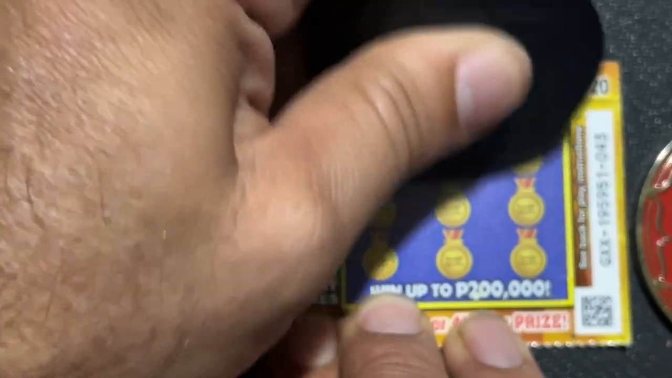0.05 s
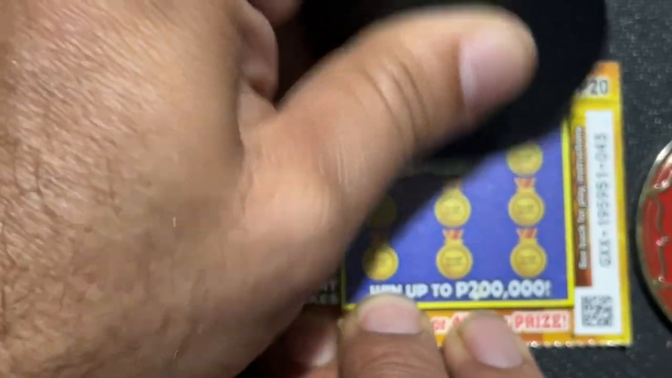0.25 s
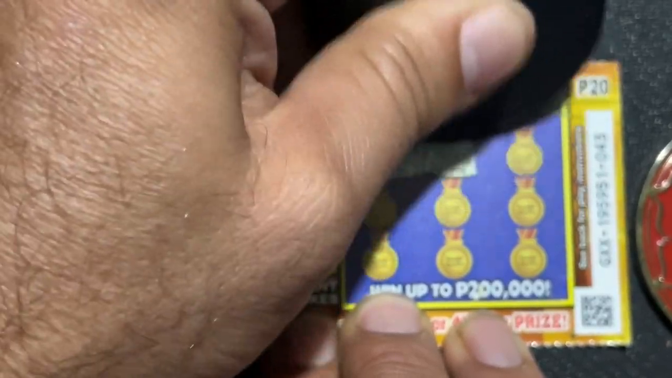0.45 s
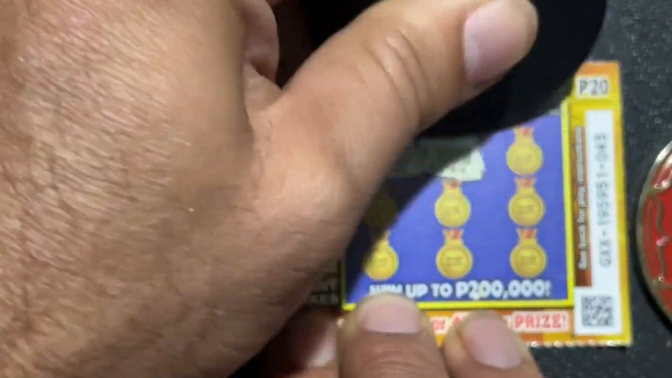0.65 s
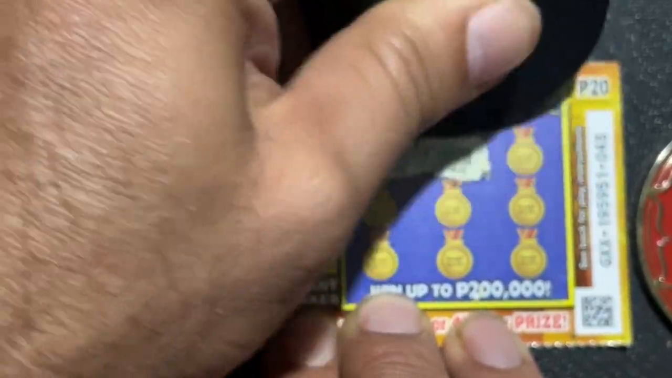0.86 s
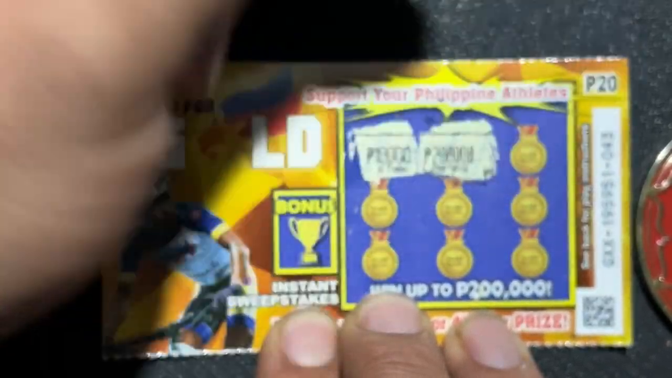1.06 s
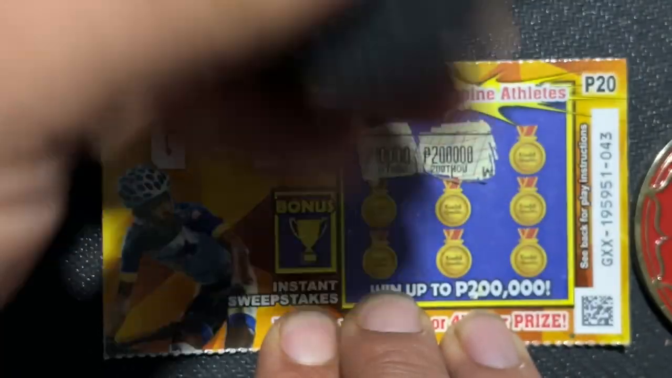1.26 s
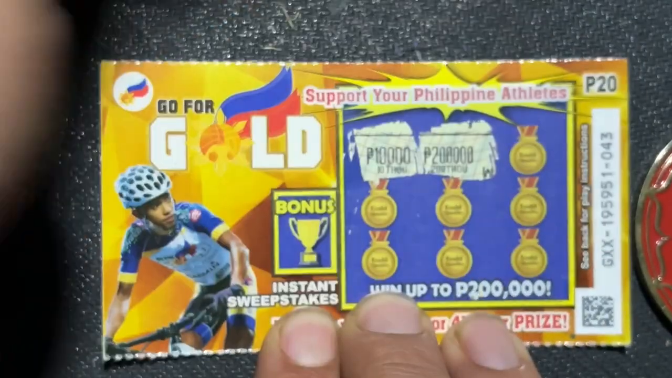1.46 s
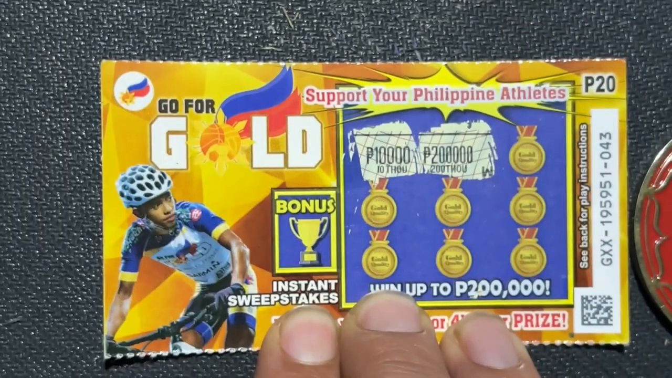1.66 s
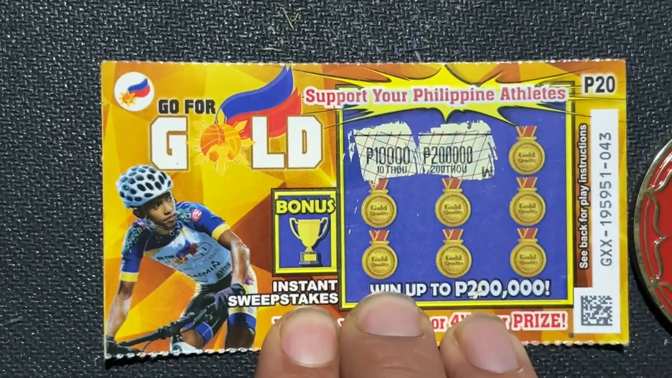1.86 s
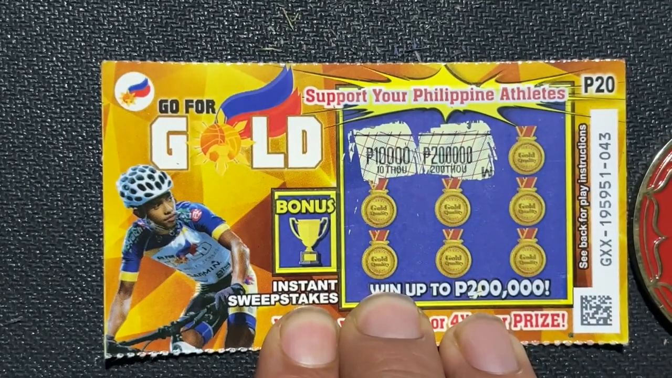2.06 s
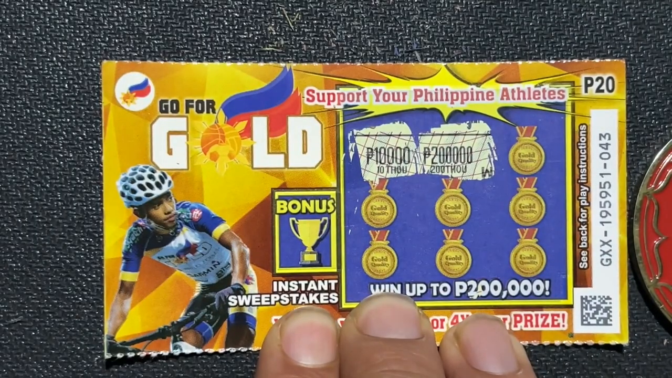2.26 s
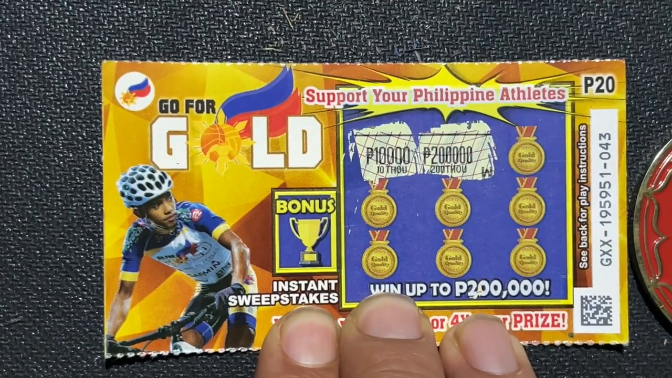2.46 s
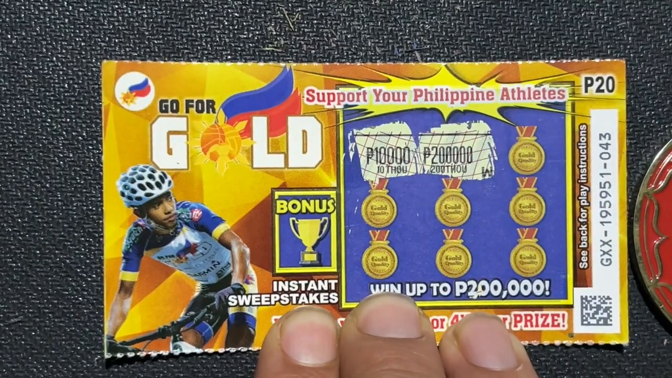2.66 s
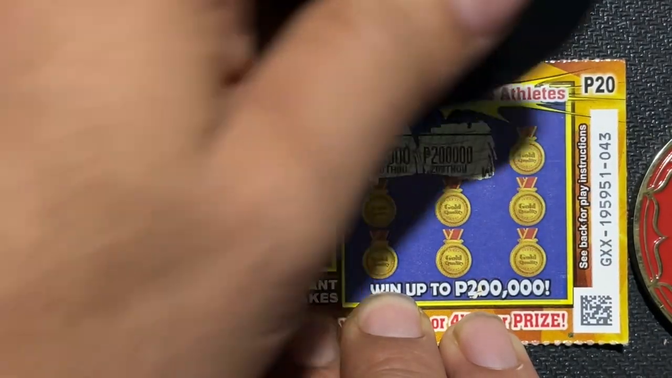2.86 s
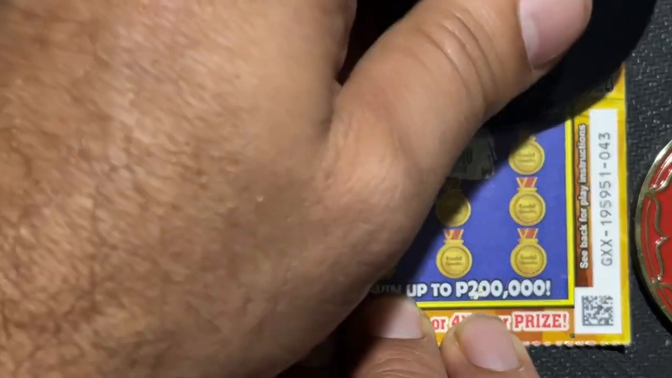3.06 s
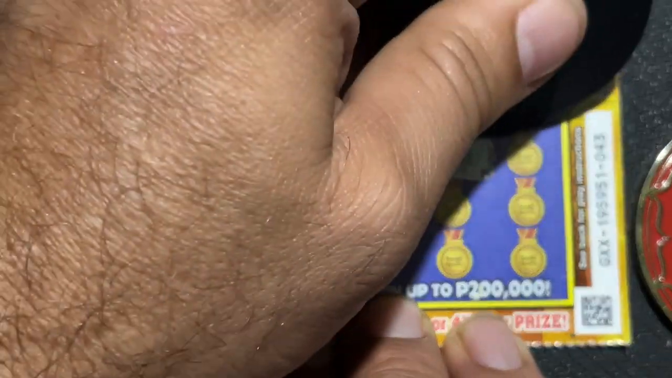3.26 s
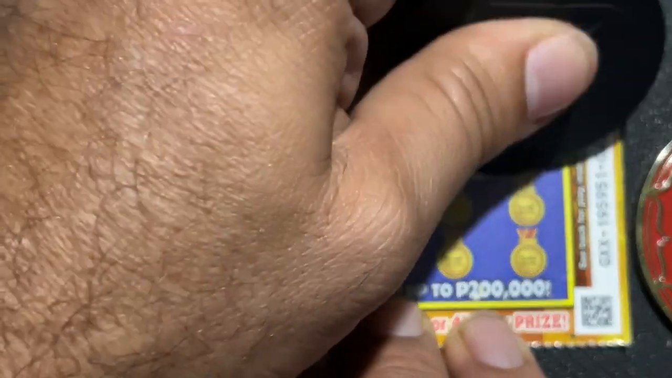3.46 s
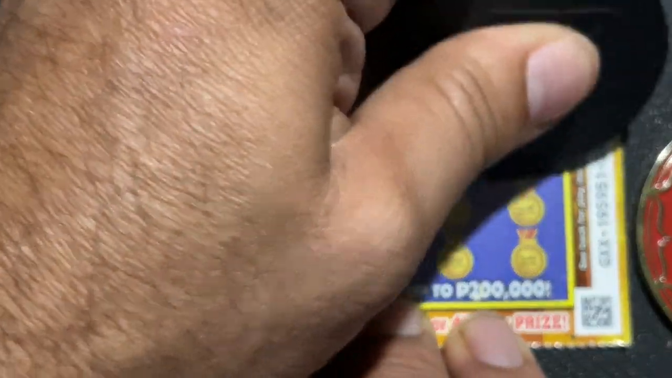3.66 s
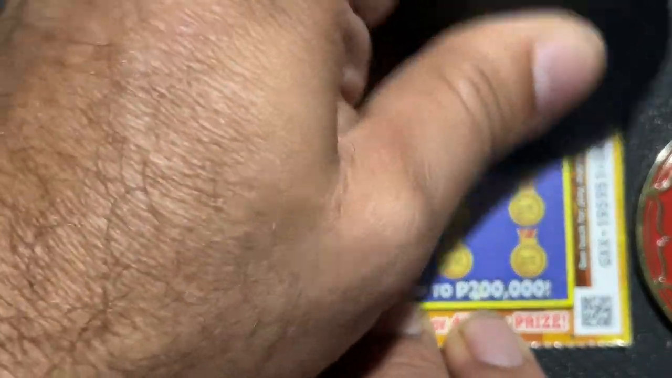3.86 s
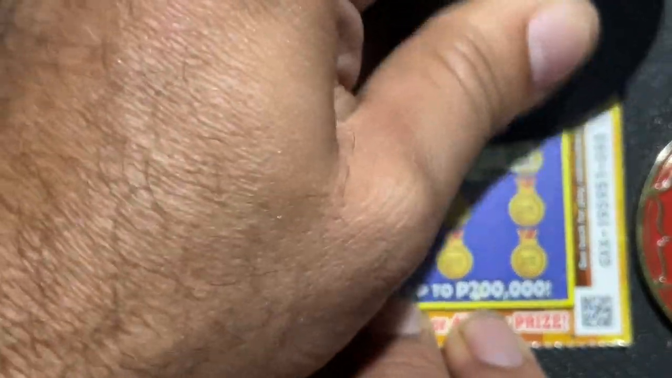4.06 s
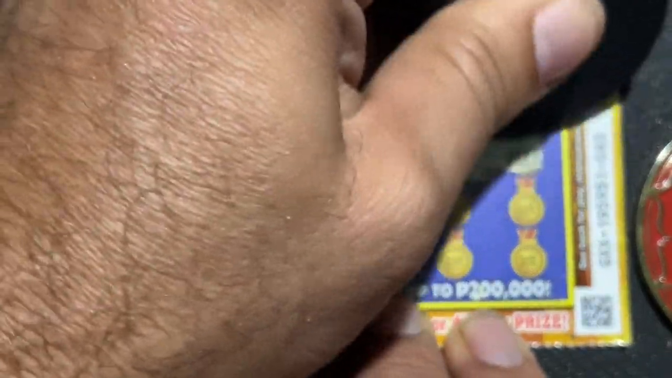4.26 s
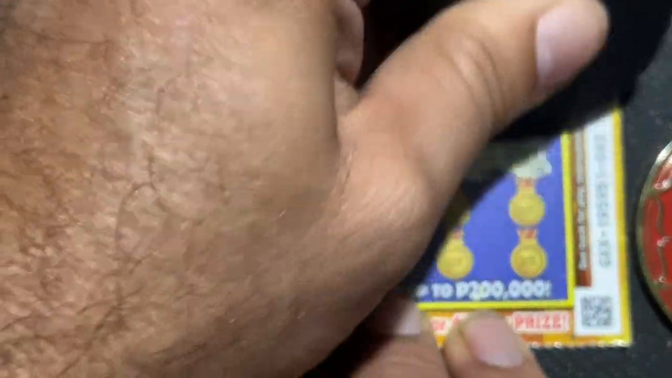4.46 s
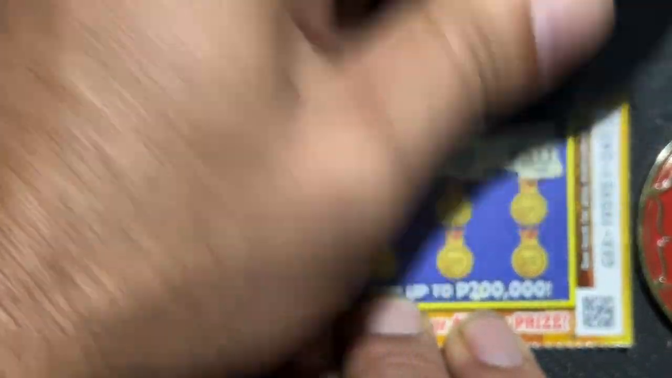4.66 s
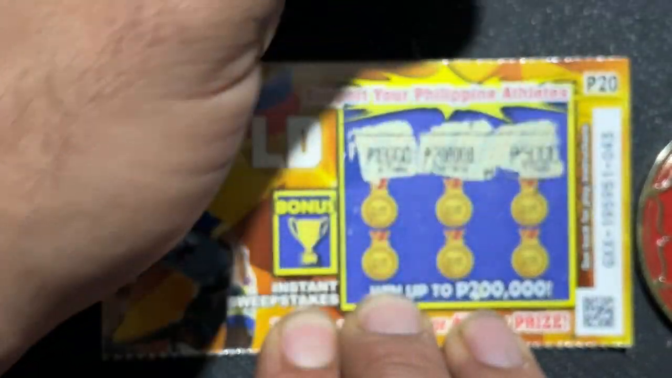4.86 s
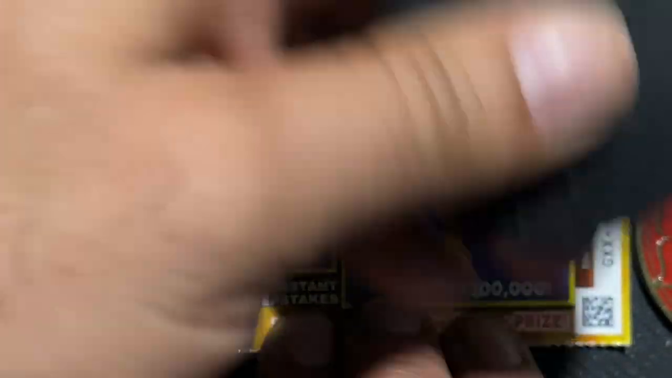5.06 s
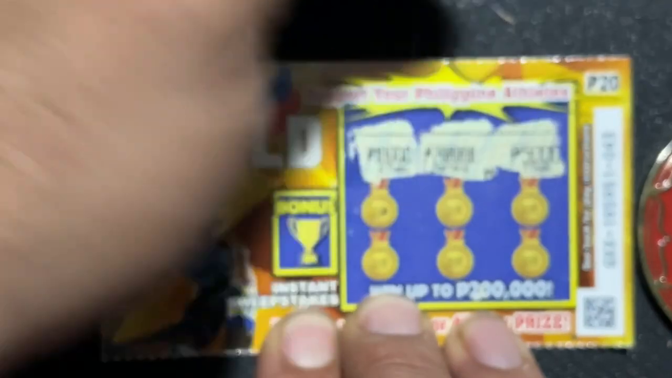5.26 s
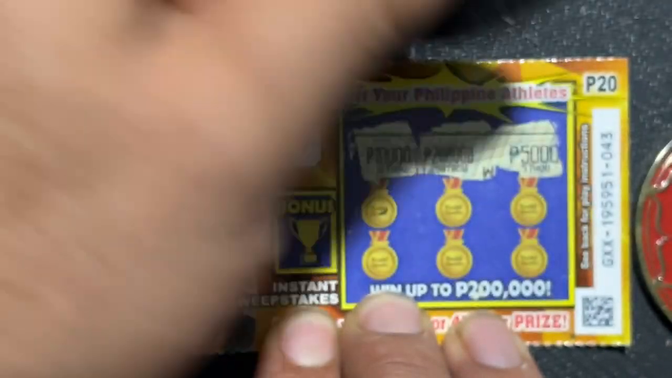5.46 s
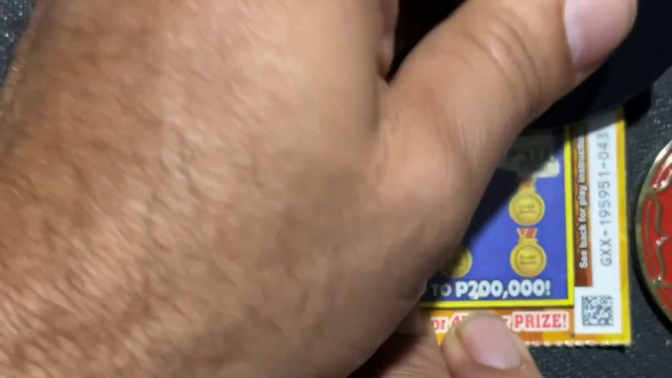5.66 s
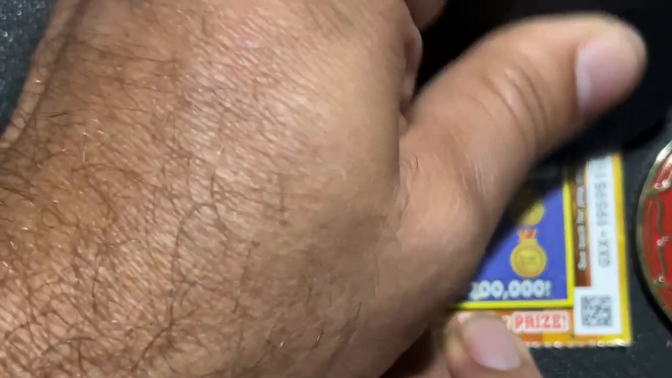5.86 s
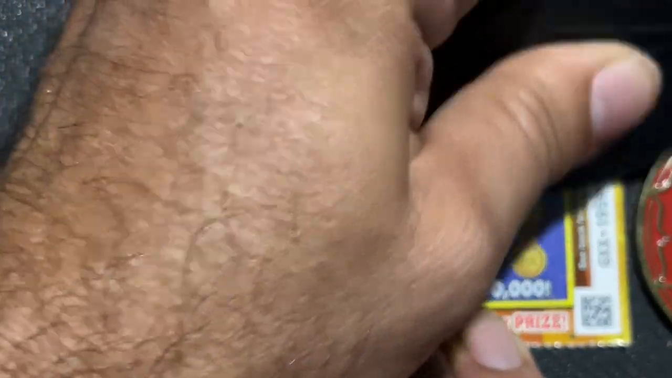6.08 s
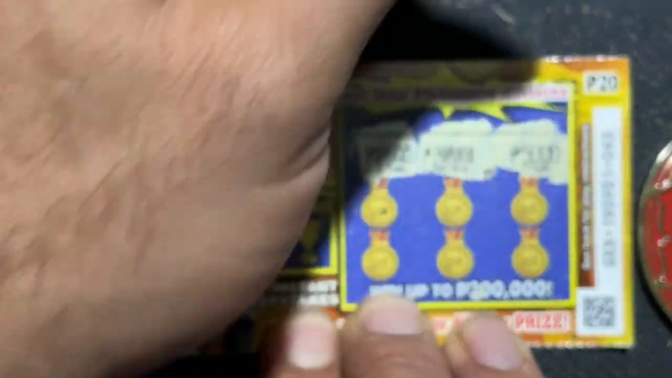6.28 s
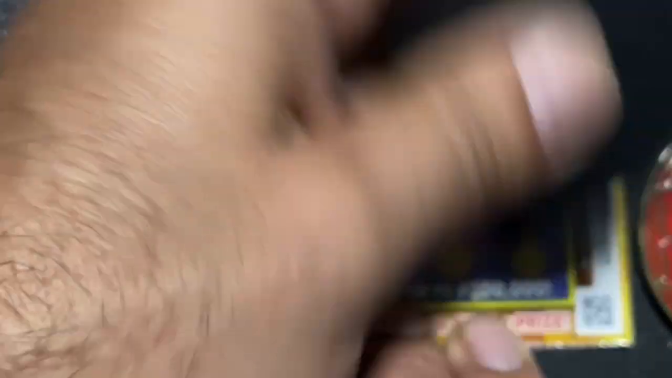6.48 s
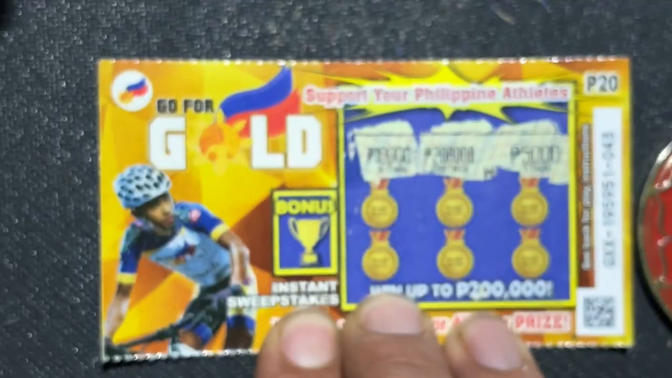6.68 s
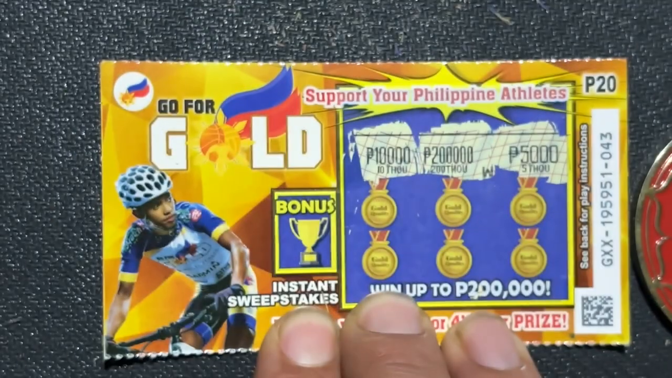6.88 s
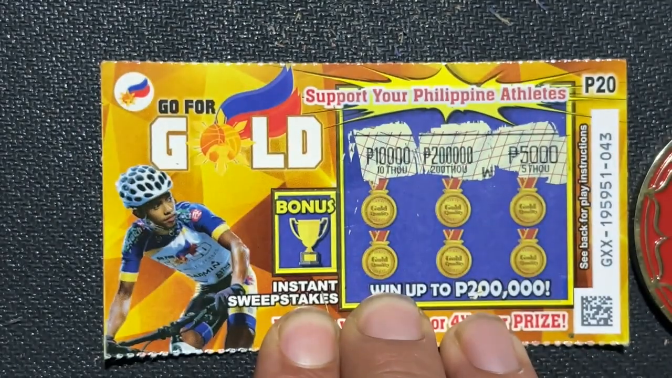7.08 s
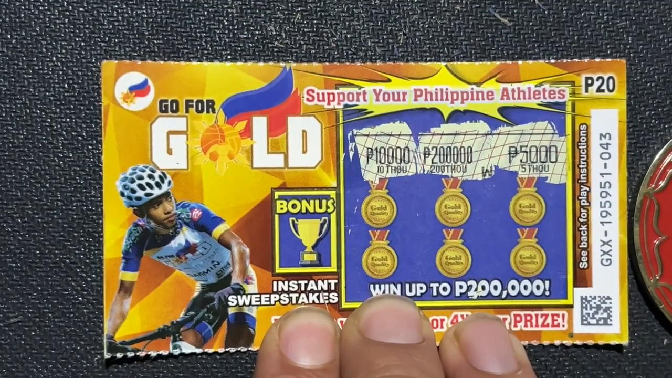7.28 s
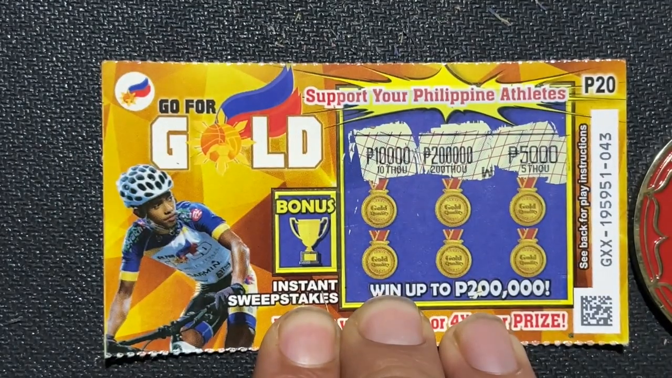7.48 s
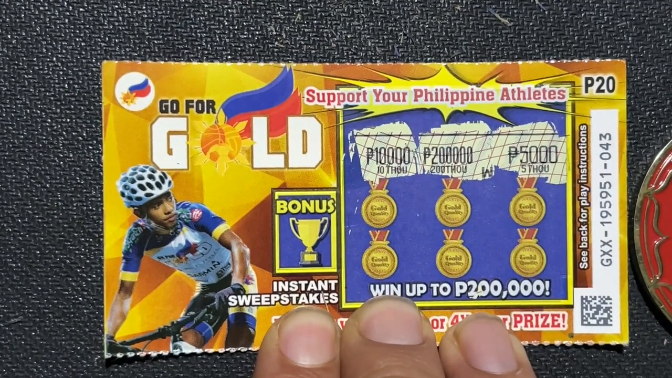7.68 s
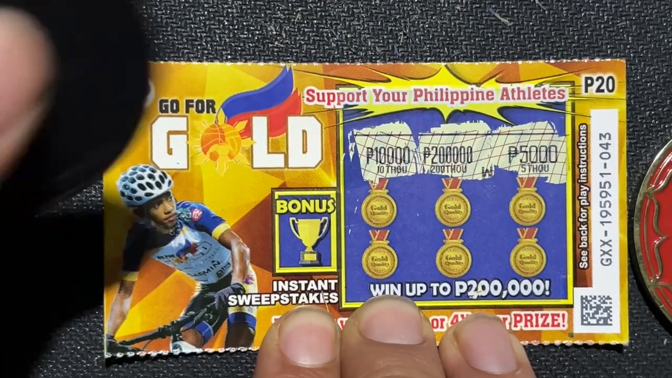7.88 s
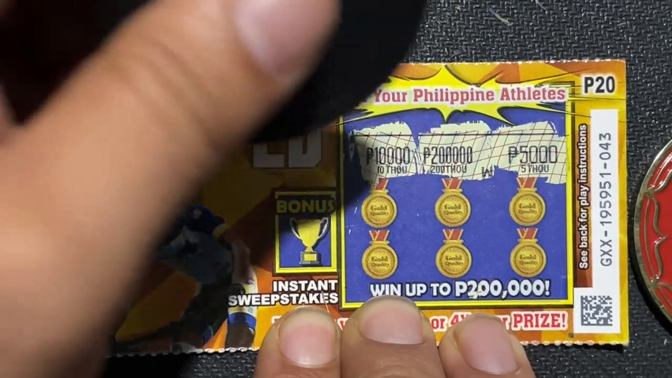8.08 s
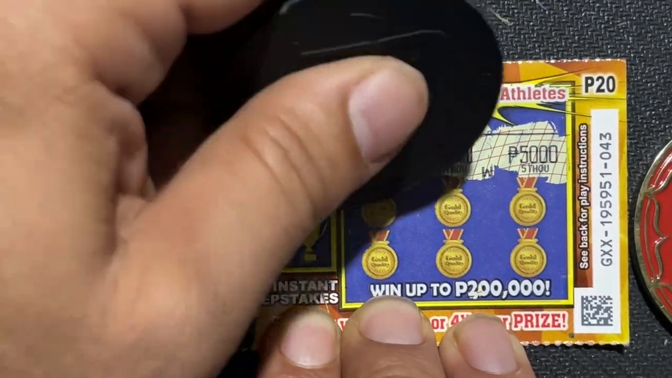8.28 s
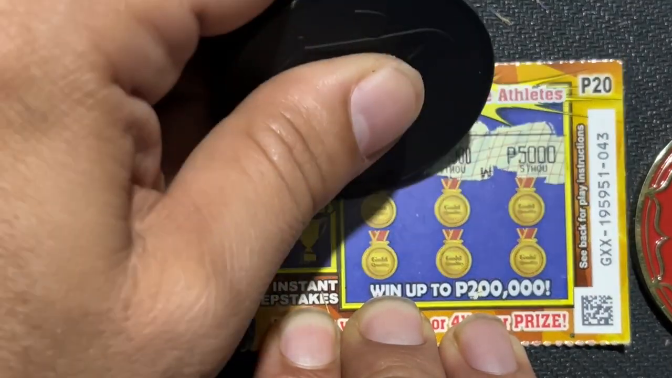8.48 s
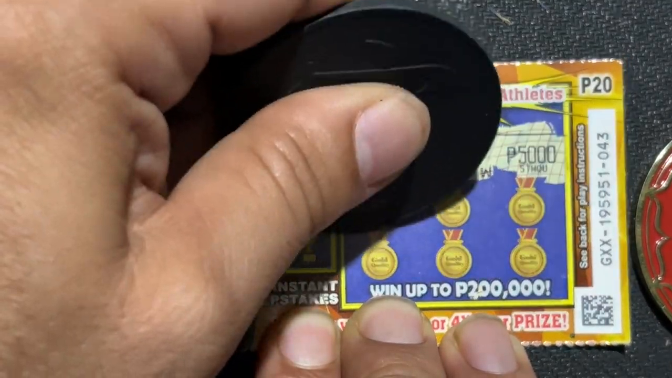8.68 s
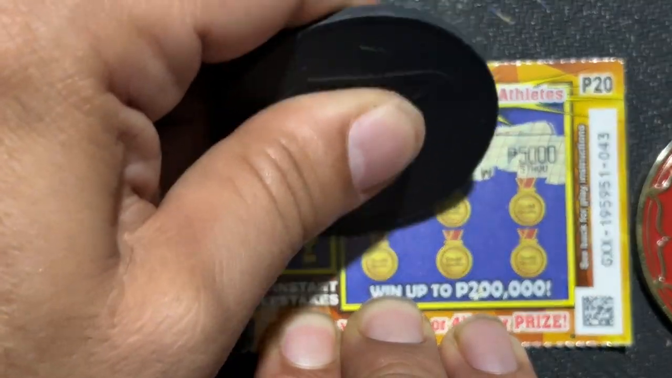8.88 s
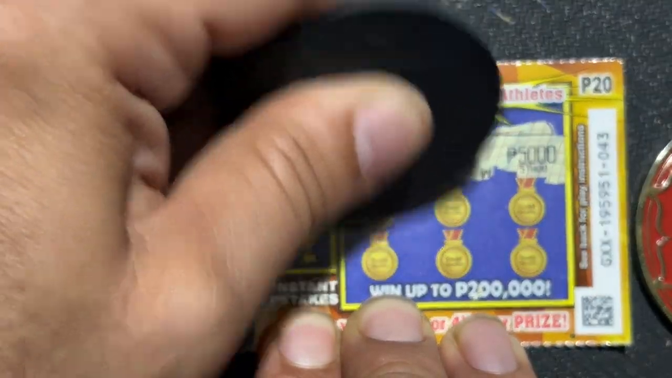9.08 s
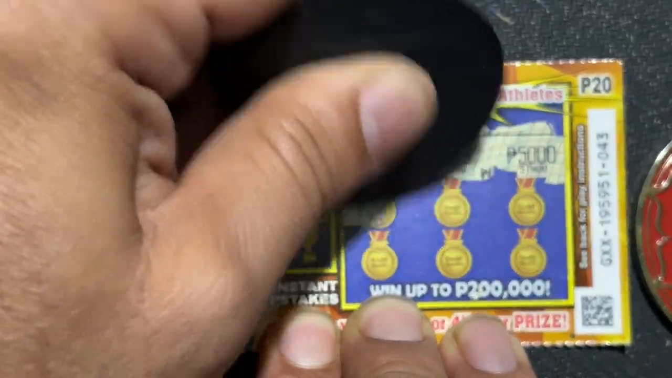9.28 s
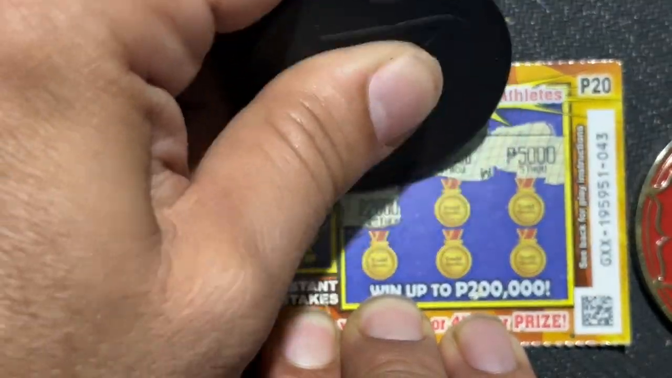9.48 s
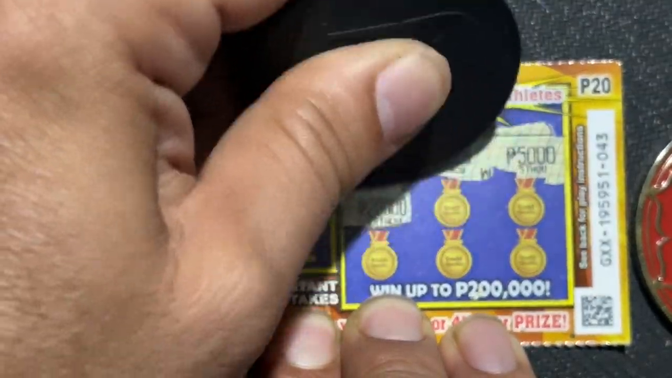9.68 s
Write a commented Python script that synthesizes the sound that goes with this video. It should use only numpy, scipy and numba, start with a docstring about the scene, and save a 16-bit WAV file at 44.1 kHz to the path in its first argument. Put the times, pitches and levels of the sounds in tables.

```python
"""Scratching a lottery ticket

A coin-like disc scrapes off the coating in four bouts of quick strokes, close to a phone's two ports.
Gliding bands of grit ring the disc: faster strokes are brighter; many judder at the ends and bump the table.
Three times filtered contacts knock the disc down, and bursts of grit sweep the crumbs away.
Noise and wavering tones make a fan in the small room; narrow noise bursts make a far-off insect.
"""
import sys
import numpy as np
from scipy import signal
from scipy.fft import rfft, irfft, next_fast_len
from scipy.io import wavfile
from numba import njit

SR = 44100
rng = np.random.default_rng(int(sys.argv[2]) if len(sys.argv) > 2 else 0)


def master_out(mix):
    """Clip the mix to full scale and print it as 16-bit PCM to the path in sys.argv[1]."""
    frames = np.transpose(np.atleast_2d(mix))
    ceiling = np.clip(frames, -1, 1)
    pcm = np.round(ceiling * 32767).astype(np.int16)
    wavfile.write(sys.argv[1], SR, pcm)


N = 429093
TIME = np.arange(N) / SR
SIZE = next_fast_len(N + SR)
FREQ = np.maximum(np.arange(SIZE // 2 + 1) * SR / SIZE, 1)


def undb(db):
    """Decibels to gain."""
    return 10 ** (np.asarray(db) / 20)


def unit(x):
    """Scale to rms 1."""
    return x / np.sqrt(np.mean(x ** 2))


def contour(points):
    """Points joined on a log-frequency axis."""
    hz, value = np.transpose(points)
    return np.interp(np.log(FREQ), np.log(hz), value)


def shape(x, gain):
    """Filter by a gain for each frequency."""
    return irfft(rfft(x, SIZE) * gain, SIZE)[..., :N]


def butter(x, hz, kind, order=2):
    """Plain low-, high- or band-pass."""
    sos = signal.butter(order, np.minimum(hz, SR / 2 - 1), kind, fs=SR, output="sos")
    return signal.sosfilt(sos, x)


def body(modes, size=2048):
    """Short minimum-phase impulse response of a body with these resonances."""
    f = np.maximum(np.arange(size // 2 + 1) * SR / size, 1)
    power = 0
    for hz, width_hz, db in modes:
        detuning = (f ** 2 - hz ** 2) / (f * width_hz)
        power = power + undb(db) ** 2 / (1 + detuning ** 2) ** 1.4
    # fold the cepstrum to make the response causal
    cepstrum = irfft(np.log(power + 1e-7) / 2)
    cepstrum[1:size // 2] *= 2
    cepstrum[size // 2 + 1:] = 0
    return irfft(np.exp(rfft(cepstrum)))


@njit
def gliding_band(x, hz, breadth):
    """State-variable band-pass whose centre moves every sample; breadth is a share of the centre."""
    y, band, low = np.empty(len(x)), 0., 0.
    for i in range(len(x)):
        g = np.tan(np.pi * hz[i] / SR)
        v = (band + g * (x[i] - low)) / (1 + g * (g + breadth))
        band, low, y[i] = 2 * v - band, low + 2 * g * v, breadth * v
    return y


def walk(rate_hz):
    """Smooth chance with a spread near 1."""
    knots = rng.standard_normal(4096)
    return 1.2 * np.interp(TIME * rate_hz, np.arange(len(knots)), knots)


def grit(rate_hz, spread_db):
    """Tiny impulses of uneven size, so many a second; rms 1."""
    hits = rng.random(N) < rate_hz / SR
    heights = rng.standard_normal(N)
    sizes = undb(spread_db * np.minimum(rng.exponential(size=N), 4))
    return unit(hits * heights * sizes)


def hand_speed(length_s, peak):
    """Speed 0-1 over one movement: up from rest until the share `peak`, then down to rest."""
    progress = np.linspace(0, 1, int(length_s * SR))
    phase = np.interp(progress, [0, np.clip(peak, .05, .95), 1], [0, .5, 1])
    return np.abs(np.sin(np.pi * phase))


def add(out, start_s, sound):
    """Mix a sound in at a time."""
    i = max(int(start_s * SR), 0)
    part = sound[:max(N - i, 0)]
    out[i:i + len(part)] += part


def motion(start_s, length_s, peak, power):
    """Loudness of one swell on the whole time line; mean square 1 while it lasts."""
    out = np.zeros(N)
    add(out, start_s, unit(hand_speed(length_s, peak) ** power))
    return out


# room air colour: freq_hz, relative_level_db
AIR = [(20, -39), (42, 0.5), (70, 1.5), (160, -0.5), (280, -2.5), (400, -3.5), (600, -6.5), (900, -10),
       (1500, -17), (2000, -13), (2750, -21), (3700, -14.5), (4300, -20), (7000, -28.5), (11000, -36),
       (12500, -38), (15000, -44)]
# likeness of the air at the two ports, clipped to -1..1 in use: freq_hz, coherence
AIR_LIKENESS = [(100, .97), (290, 0.8), (640, -0.093), (1400, 1), (3100, -0.08), (4300, 0.95),
                (6100, -1.84), (9000, 1), (12300, -1.2), (15000, -0.1)]
# fan and mains, level before waver: pitch_hz, level_db, left_lead_rad
HUM = [(118.3, -57, 0.11), (357.3, -65.5, 0.52), (486.6, -69, 0.74), (650.4, -62, 1.38), (1193, -70, 1.87)]


def fan(air_db=-53, waver_db=2.5):
    """Steady air, partly alike at the two ports, and motor lines wavering in level and phase."""
    likeness = np.clip(contour(AIR_LIKENESS), -1, 1)
    colour = undb(contour(AIR))
    mid = shape(rng.standard_normal(N), colour * np.sqrt(1 + likeness))
    side = shape(rng.standard_normal(N), colour * np.sqrt(1 - likeness))
    out = undb(air_db) * unit(np.array([mid + side, mid - side]))
    for hz, db, lead_rad in HUM:
        phase = 2 * np.pi * hz * TIME + 1.2 * walk(8)
        level = np.sqrt(2) * undb(db + waver_db * walk(6.7))
        out += level * np.sin([phase + lead_rad, phase])
    return out


# runs of chirps: first_middle_s, last_middle_s, approx_rate_hz, level_db
CHIRP_RUNS = [(.13, 1.554, 7, -63.5), (1.903, 2.77, 3.4, -65.5), (2.916, 4.724, 7, -64),
              (5.027, 6.32, 7, -64), (6.537, 7.983, 6.9, -62.5), (8.457, 9.615, 7, -64.5)]
CHIRP_HZ, CHIRP_WIDTH_HZ, CHIRP_S = 3710, 280, 0.16  # blurred by the distance into a narrow band


def insect(side_db=-7):
    """Soft, evenly spaced chirps of narrow noise from far away, almost alike at the two ports."""
    swell = np.zeros(N)
    for first_s, last_s, rate_hz, db in CHIRP_RUNS:
        count = int(round((last_s - first_s) * rate_hz)) + 1
        for middle_s in np.linspace(first_s, last_s, count):
            add(swell, middle_s - CHIRP_S / 2, undb(db) * hand_speed(CHIRP_S, 0.47))
    band = np.exp(-((FREQ - CHIRP_HZ) / CHIRP_WIDTH_HZ) ** 2)
    mid, side = unit(shape(rng.standard_normal((2, N)), band))
    return swell * (mid + undb(side_db) * side * np.array([[1], [-1]]))


# soft swells of faint hiss: start_s, length_s, level_db
HISS_SWELLS = [(1.434, 0.31, -61), (2.46, 0.11, -73.5), (2.718, .17, -63), (4.594, 0.42, -66.5),
               (5.442, 0.31, -74), (6.12, .26, -63.5), (6.52, 0.15, -63), (7.693, .13, -66),
               (8.185, 0.084, -67)]
# colour of the faint hiss: freq_hz, relative_level_db
HISS_COLOUR = [(300, 0), (2000, 7.5), (4200, 8), (6500, 2), (9500, 5.5), (12000, 1), (15000, -3)]
SWELL_PEAK = 0.11  # share of a hiss swell or drag spent rising


def faint_hiss(flutter_db=4.0):
    """Soft, uneven swells of faint hiss between the strokes, from dense coloured impulses."""
    hiss = grit(rate_hz=13000, spread_db=1.5) * undb(flutter_db * walk(37))
    hiss = unit(shape(hiss, undb(contour(HISS_COLOUR))))
    swell = sum(undb(db) * motion(start_s, length_s, SWELL_PEAK, power=0.43)
                for start_s, length_s, db in HISS_SWELLS)
    return hiss * swell


# side of the hand dragging on the card: start_s, length_s, level_db, brightness_hz, unevenness_db
DRAGS = [(0, 0.99, -53, 294, 4), (1.43, .12, -53, 300, 6), (3.596, 1.03, -51.5, 310, 2.5),
         (3.963, .115, -45, 990, .5), (5.755, 0.45, -55, 355, 1.5), (6.453, .085, -38.5, 597, 3),
         (6.531, 0.12, -49.5, 250, 2), (8.583, 1.2, -54, 280, 2.5)]
# drag colour: freq_hz, relative_level_db
DRAG_COLOUR = [(25, -5), (55, -4.5), (170, 3), (330, -3.5), (800, -3.5), (1500, -5.5), (4000, -25),
               (15000, -3.5)]


def dragging():
    """The hand rumbles on the card, each slide with its own brightness and unevenness."""
    skin = shape(rng.standard_normal(N), undb(contour(DRAG_COLOUR)))
    grip = walk(25)
    out = np.zeros(N)
    for start_s, length_s, db, bright_hz, uneven_db in DRAGS:
        rumble = unit(butter(skin * undb(uneven_db * grip), bright_hz, "low", order=1))
        out += undb(db) * rumble * motion(start_s, length_s, SWELL_PEAK, power=0.044)
    return out


# hand settling on the table or pushing off it: start_s, level_db (before bump_db)
BUMPS = [(0.845, -32), (0.884, -36), (0.976, -39), (1.371, -26), (1.837, -36), (3.206, -38.5), (3.673, -40),
         (5.161, -28.5), (5.77, -30), (5.817, -37), (6.101, -44), (6.466, -30.5), (6.947, -37.5),
         (8.422, -40), (9.492, -37)]
# table top, pitch before scatter: pitch_hz, t60_s, relative_level_db
TABLE_MODES = [(57.3, 0.34, -16), (95.6, 0.14, -7), (123.6, 0.099, 3.5), (196, 0.055, 2.5),
               (272.4, 0.036, -4.5)]
BRAKE_LEAD_S = 0.0045  # the hand brakes just before a stroke ends and bumps the table


def table(push_s=0.0043, bump_db=1.0):
    """The hand pushes the table top as it settles or a stroke brakes; each spot rings differently."""
    t = TIME[:SR // 3]
    push = 1 - np.exp(-(t / push_s) ** 2)
    out = np.zeros(N)
    brakes = [(start_s + length_s - BRAKE_LEAD_S, db) for start_s, length_s, *_, db in STROKES]
    for start_s, db in BUMPS + brakes:
        spot = 1 + 0.063 * rng.standard_normal(len(TABLE_MODES))
        ring = np.zeros(len(t))
        for (hz, t60_s, mode_db), detune in zip(TABLE_MODES, spot):
            ring += undb(mode_db - 60 * t / t60_s) * np.sin(2 * np.pi * hz * detune * t)
        ring *= push
        add(out, start_s, undb(db + bump_db) * ring / np.abs(ring).max())
    return out


# disc ringing faintly as the fingers shift on it: start_s, level_db (before mode level)
TINGS = [(2.711, -46.5), (4.9, -58)]
# free ring of the disc: pitch_hz, t60_s, relative_level_db
TING_MODES = [(4412, 0.14, 7), (9880, .17, -5)]


def tinging(rise_s=0.01):
    """A thin, soft-edged ring of decaying sines from the loosely held disc."""
    t = TIME[:SR // 4]
    ring = sum(undb(db - 60 * t / t60_s) * np.sin(2 * np.pi * hz * t) for hz, t60_s, db in TING_MODES)
    ring = ring * (1 - np.exp(-t / rise_s))
    out = np.zeros(N)
    for start_s, db in TINGS:
        add(out, start_s, undb(db) * ring)
    return out


# sweeps across the card, ring before wander: start_s, length_s, level_db, ring_hz, speeding_up_share
SWEEPS = [(1.361, 0.092, -35, 1780, 0.79), (5.153, 0.085, -38, 1950, 0.62), (6.455, 0.083, -38, 1960, 0.84)]
# sweep colour: freq_hz, relative_level_db
SWEEP_COLOUR = [(40, -10.5), (200, 4), (400, -8.5), (700, -16), (1100, -5.5), (1350, -17), (1650, -4),
                (2100, -3.5), (2700, -9), (3300, -3.5), (4200, -4), (6000, -7), (9000, -11), (15500, -13)]


def sweeping(flutter_db=0.0, ring_db=-9, ring_wander=0.056, ring_breadth=0.077):
    """The disc skates over the card, pushes the crumbs ahead and rings most at full speed."""
    crumbs = grit(rate_hz=9000, spread_db=0.5) * undb(flutter_db * walk(300))
    crumbs = unit(shape(crumbs, undb(contour(SWEEP_COLOUR))))
    rub = rng.standard_normal(N)
    wander = 1 + ring_wander * walk(90)
    out = np.zeros(N)
    for start_s, length_s, db, ring_hz, peak in SWEEPS:
        ring = undb(ring_db) * unit(gliding_band(rub, ring_hz * wander, float(ring_breadth)))
        hiss = crumbs * motion(start_s, length_s, peak, power=0.91)
        out += undb(db) * (hiss + ring * motion(start_s, length_s, peak, power=2.7))
    return out


# edge of the disc landing or catching: start_s, ring_level_db, sharpness_hz, main_ring_hz, thud_re_ring_db
KNOCKS = [(.173, -41.5, 2200, 1680, -10), (0.511, -43.5, 1190, 1130, -2.5), (.627, -44.5, 2000, 1470, -10),
          (0.842, -43, 1500, 1550, -12), (0.972, -45, 14800, 1810, -6), (1.365, -18, 6900, 1710, -17),
          (1.366, -27.5, 3560, 2230, -11.5), (1.369, -29.5, 895, 1430, -2), (1.381, -31.5, 1190, 1800, -10),
          (1.84, -50.5, 1990, 1800, -10), (2.537, -51, 1000, 1950, -12), (3.126, -42, 17700, 1910, -10),
          (3.638, -48.5, 7000, 1900, -12), (3.753, -40, 3350, 1930, -5.5), (3.845, -45.5, 2500, 2050, -12),
          (3.995, -41, 2010, 1960, -3.5), (4.324, -42, 9100, 1930, -9), (4.356, -46, 900, 1750, -12),
          (4.444, -45, 2500, 1920, -21), (4.65, -53.5, 1000, 1840, -16), (4.85, -48.5, 5940, 1900, -5),
          (5.15, -24.5, 3050, 1860, -24), (5.154, -40.5, 1320, 1850, 4), (5.202, -38, 2000, 1930, -16),
          (5.218, -37, 9000, 1980, -21), (5.223, -37, 1200, 1970, -17), (5.606, -51.5, 2000, 1850, -12),
          (5.639, -49, 14000, 1740, -11), (5.769, -52, 1000, 1800, -1), (5.814, -54.5, 2500, 1850, -8),
          (6.076, -46.5, 5200, 1780, -1), (6.292, -53.5, 14000, 2000, -19), (6.455, -39, 3040, 1810, -4),
          (6.459, -35, 4020, 1850, -25), (6.462, -27.5, 1510, 1850, -0.5), (6.467, -38, 300, 1820, 6.5),
          (8.398, -40, 1390, 1630, -11), (8.992, -41, 1490, 1850, -7), (9.098, -50, 6000, 1930, -19),
          (9.524, -52, 12500, 1870, -5)]
# loosely held disc: multiple_of_main_ring, width_hz, relative_level_db
KNOCK_MODES = [(.6, 400, -15), (1, 250, 1), (1.3, 450, -8.5), (1.7, 500, -10), (2.2, 550, -4.5),
               (2.6, 700, -5), (3.3, 1000, -10), (4.9, 1800, -12), (7.3, 4000, -15)]
# thud pitch at that contact sharpness; softer contacts thud lower
THUD_HZ, THUD_CONTACT_HZ, THUD_RISE = 686, 3380, 0.37
# blows above this level keep the disc chattering, growing in dB per dB
CHATTER_FROM_DB, CHATTER_GROWTH = -35.5, 0.06


def knocking(rattle_s=0.0028, rattle_db=-18, thud_s=0.0024):
    """A sharp contact and brief rattle ring the disc at its grip's pitch; the backing thuds dully."""
    t = TIME[:4096]
    out = np.zeros(N)
    for start_s, db, sharp_hz, ring_hz, thud_db in KNOCKS:
        thud_hz = THUD_HZ * (sharp_hz / THUD_CONTACT_HZ) ** THUD_RISE
        thud = np.sin(2 * np.pi * thud_hz * t) * np.exp(-t / thud_s)
        disc = body([(ring_hz * k, width_hz, mode_db) for k, width_hz, mode_db in KNOCK_MODES])
        chatter_db = rattle_db + CHATTER_GROWTH * max(db - CHATTER_FROM_DB, 0)
        rattle = undb(chatter_db) * rng.standard_normal(len(t)) * np.exp(-t / rattle_s)
        force = (t == 0) + rattle
        ring = butter(signal.fftconvolve(force, disc)[:len(t)], sharp_hz, "low", order=1)
        ring = butter(ring, 4 * sharp_hz, "low", order=1)  # the card cushions soft contacts further
        # level over the first 10 ms
        ring = ring / np.std(ring[:SR // 100])
        thud = thud / np.std(thud[:SR // 100])
        add(out, start_s, undb(db) * (ring + undb(thud_db) * thud))
    return out


# stick-slip chirps as the edge sets off or stops: start_s, length_s, level_db (before grip_db), first_hz, last_hz
JUDDERS = [(0.02, 0.022, -45.5, 1570, 1860), (.058, 0.017, -41.5, 1870, 1150),
           (0.17, 0.0086, -38.5, 2770, 1020), (0.239, 0.01, -42, 1610, 1950),
           (0.281, 0.016, -40.5, 1600, 1120), (0.397, 0.014, -47, 1800, 1250),
           (0.461, 0.02, -42.5, 1340, 1750), (0.509, 0.01, -42, 1900, 880),
           (0.688, 0.012, -40.5, 1400, 1850), (0.735, 0.031, -48, 1600, 1150),
           (.879, .014, -43.5, 1840, 1500), (3.392, 0.016, -38, 1870, 1110),
           (3.531, 0.016, -55, 1400, 1050), (3.641, 0.01, -40.5, 2030, 1050),
           (3.84, 0.0099, -42, 1360, 1670), (4.338, 0.013, -41.5, 1860, 770),
           (4.456, 0.016, -47, 2180, 1300), (4.564, 0.016, -39, 2050, 910), (5.886, 0.019, -47, 1760, 1350),
           (6.081, 0.023, -43.5, 1850, 1120), (8.636, 0.015, -54, 1450, 1100),
           (8.773, 0.014, -51, 1450, 1100), (8.875, 0.022, -51, 1450, 1090),
           (9.104, 0.0042, -41, 1700, 1080), (9.217, 0.011, -49, 1800, 1000),
           (9.317, 0.0069, -57, 1900, 1000), (9.434, 0.018, -44, 1530, 1090),
           (9.55, 0.019, -49.5, 1440, 1190)]


def juddering(breadth=0.19, peak=0.83, even=0.74, grip_db=-1.0):
    """The edge sticks and slips at a gliding rate: a rough chirp of fairly even slips."""
    out = np.zeros(N)
    for start_s, length_s, db, first_hz, last_hz in JUDDERS:
        swell = hand_speed(length_s, peak) ** 0.15
        glide_hz = np.geomspace(first_hz, last_hz, len(swell))
        slips = gliding_band(rng.standard_normal(len(swell)), glide_hz, float(breadth))
        envelope = np.abs(signal.hilbert(unit(slips)))
        slips = slips / (envelope + .1) ** even
        add(out, start_s, undb(db + grip_db) * unit(gliding_band(slips, glide_hz, 1.0) * swell))
    return out


# strokes: start_s, length_s, rasp_level_db (before press_db), full_speed_grain_hz, speeding_up_share,
# full_speed_edge_note_hz, edge_level_db (re low rasp), stop_bump_db (before bump_db)
STROKES = [(0.02, 0.058, -44.5, 1950, .7, 1700, -8, -39), (0.132, 0.054, -48, 2600, 0.46, 2060, -8, -35.5),
           (0.239, 0.059, -42.5, 2000, 0.51, 1700, -4, -48),
           (0.359, 0.056, -47, 2330, 0.43, 1260, -14, -40.5),
           (.463, 0.055, -41.5, 2180, .59, 1700, -9, -33.5), (0.568, 0.066, -48, 1750, 0.91, 1240, -1, -35),
           (0.685, 0.072, -45, 2250, .42, 1690, -9, -46), (0.82, 0.037, -53, 1730, 0.53, 1600, -18, -53),
           (0.882, 0.058, -43, 2340, 0.46, 1700, -6, -48), (1, 0.12, -58.5, 2310, 0.13, 1700, -12, -60),
           (3.336, 0.092, -43.5, 1710, 0.47, 1700, -3, -42),
           (3.471, 0.08, -44.5, 1610, 0.45, 1260, -12, -52),
           (3.603, .049, -44.5, 2040, 0.73, 1580, -6, -33), (3.724, .046, -44.5, 1860, 0.69, 1910, -3, -37),
           (3.848, 0.036, -44, 2220, 0.77, 2030, -7, -34.5), (3.968, 0.031, -43, 2460, 0.5, 2090, 0, -50),
           (4.068, 0.053, -43, 2720, .45, 2250, -1.5, -33.5),
           (4.203, 0.043, -46, 2620, 0.33, 2130, -4, -43), (4.292, 0.056, -43, 3070, .62, 2220, -5, -29),
           (4.403, 0.087, -53, 2080, .32, 1760, -6, -52), (4.517, 0.061, -42, 2630, 0.39, 3950, -11, -39.5),
           (4.831, 0.035, -56, 3300, 0.7, 1910, -8, -62), (5.83, 0.074, -49, 2230, 0.69, 1650, -4, -66),
           (5.942, 0.064, -50.5, 2110, .5, 1280, -17, -55),
           (6.048, 0.044, -47.5, 1890, 0.92, 1670, -3, -35.5),
           (8.589, .074, -46, 1920, 0.41, 1250, -13, -43),
           (8.706, 0.092, -47, 2060, 0.43, 1280, -10, -39.5),
           (8.832, 0.066, -45.5, 2330, 0.48, 1250, -5, -37.5),
           (8.958, .047, -45, 2300, 0.65, 1960, -2, -37), (9.071, 0.039, -51, 2300, 0.99, 1210, -5, -31.5),
           (9.172, 0.064, -48.5, 2870, 0.36, 2020, -6, -54),
           (9.284, .055, -47, 3380, 0.34, 3370, -3.5, -38.5),
           (9.39, 0.071, -47, 2750, 0.47, 1250, -24, -44),
           (9.507, 0.052, -46.5, 3330, .38, 3600, -8, -34.5),
           (9.616, 0.063, -48, 2900, 0.59, 1270, -26, -39), (9.717, 0.027, -47, 2010, .52, 1940, 0, -51)]
# disc pressed on the card, before grip scatter: pitch_hz, width_hz, relative_level_db
SCRAPE_MODES = [(335, 230, -0.5), (721, 340, -3), (1128, 234, 5.5), (1780, 230, -0.5), (2250, 290, -5),
                (3310, 410, -3), (3827, 280, 1.5), (4420, 220, -1.5), (4950, 260, -6), (6500, 190, 3),
                (7020, 300, 2), (8440, 1300, -3), (9725, 210, 11), (13600, 4700, -1), (15400, 170, 11)]
# grip of each bout: from_s, bite_re_rasp_db, hiss_re_rasp_db (both at GRAIN_HZ), hiss_top_hz
BOUTS = [(0, -1, -5.5, 18000), (3.2, -2.4, -10.5, 18000), (5.5, 0.62, -7, 18000), (8.3, 0.24, -8.5, 11000)]
GRAIN_HZ = 2300  # grain pitch of an average stroke
BITE_DB_PER_OCTAVE, HISS_DB_PER_OCTAVE = 12.5, 12  # faster strokes are brighter
SNAPS_PER_S, SNAP_DB = 190, -7  # crumbs of coating snap off; level re the rest of the friction
EDGE_SLOW, EDGE_BREADTH = 0.86, 0.11  # share of the edge note left at rest; width as share of pitch
GRIP_SCATTER_HZ, GRIP_SCATTER_DB = 45, 1.8  # spread of the disc's resonances between strokes


def scraping(rasp_power=0.65, bite_power=0.36, hiss_power=0.3, chatter_db=0.5,
             slow_pitch=0.42, breadth=0.96, press_db=-0.5):
    """Coating crumbles under the edge; grain rises with speed and rings the disc, whose edge sings."""
    friction = grit(rate_hz=15000, spread_db=1.0) * undb(chatter_db * walk(260))
    friction = friction + undb(SNAP_DB) * grit(rate_hz=SNAPS_PER_S, spread_db=3.0)
    grips = rng.standard_normal((len(STROKES), len(SCRAPE_MODES), 2))
    out = np.zeros(N)
    for stroke, grip in zip(STROKES, grips):
        start_s, length_s, db, grain_hz, peak, note_hz, note_db, _ = stroke
        speed = hand_speed(length_s, peak)
        _, bite_db, hiss_db, hiss_top_hz = BOUTS[sum(start_s > bout[0] for bout in BOUTS[1:])]
        disc = body([(hz + GRIP_SCATTER_HZ * a, width_hz, mode_db + GRIP_SCATTER_DB * b)
                     for (hz, width_hz, mode_db), (a, b) in zip(SCRAPE_MODES, grip)])
        force = friction.take(int(start_s * SR) + np.arange(len(speed)), mode="wrap")
        edge_hz = note_hz * (EDGE_SLOW + (1 - EDGE_SLOW) * speed)
        edge = gliding_band(gliding_band(force, edge_hz, EDGE_BREADTH), edge_hz, EDGE_BREADTH)
        pitch_hz = grain_hz * (slow_pitch + (1 - slow_pitch) * speed ** 2)
        force = gliding_band(force, pitch_hz, float(breadth))
        ring = signal.fftconvolve(force, disc)[:len(speed)]
        # each band follows the speed by its own power
        low = unit(butter(ring, 2500, "low", order=4))
        rasp = (low + undb(note_db) * unit(edge)) * speed ** rasp_power
        bite = butter(ring, [2500, 5500], "band", order=4) * speed ** bite_power
        hiss = butter(ring, 5500, "high", order=4) * speed ** hiss_power
        hiss = butter(hiss, hiss_top_hz, "low")
        octaves = np.log2(grain_hz / GRAIN_HZ)
        treble = undb(bite_db + BITE_DB_PER_OCTAVE * octaves) * unit(bite)
        treble = treble + undb(hiss_db + HISS_DB_PER_OCTAVE * octaves) * unit(hiss)
        add(out, start_s, undb(db + press_db) * (unit(rasp) + treble))
    return out


def room(x, t60_s=0.33, wet_db=-21.0, damp_hz=3500, rise_s=0.0082):
    """Diffuse reflections from near walls as decaying noise, different at each port."""
    t = TIME[:SR * 3 // 4]
    envelope = undb(-60 * t / t60_s) * (1 - np.exp(-t / rise_s))
    tail = butter(rng.standard_normal((2, len(t))) * envelope, damp_hz, "low", order=2)
    tail = tail / np.sqrt(np.sum(tail ** 2) / 2)
    return undb(wet_db) * shape(x, rfft(tail, SIZE))


# lead of the left port over the right for sound from the ticket: freq_hz, lead_rad
PORT_LEAD = [(0, -0.0), (700, -0.87), (1100, -0.4), (1900, 0.07), (2800, 2.13), (4000, 0.74), (5000, 1.72),
             (6100, 3.18), (7500, 4.74), (9000, 6.29), (10600, 7.56), (11400, 9.22), (13100, 9.64),
             (14600, 12.11)]


def scene():
    """The handwork and faint hiss reach the two ports out of step and excite the room."""
    work = faint_hiss() + dragging() + table() + tinging()
    work = work + sweeping() + knocking() + juddering() + scraping()
    lead_rad = np.interp(FREQ, *np.transpose(PORT_LEAD))
    direct = shape(work, np.exp(.5j * np.array([lead_rad, -lead_rad])))
    return fan() + insect() + room(butter(work, 280, "high")) + direct


TOP_HZ = 15900


def record(dry):
    """The phone drops the deepest bass and cuts the top."""
    low_cut = butter(dry, 35, "high", order=4)
    return signal.sosfilt(signal.ellip(10, .2, 80, TOP_HZ, fs=SR, output="sos"), low_cut)


dry = scene()
out = record(dry)
master_out(out)
```